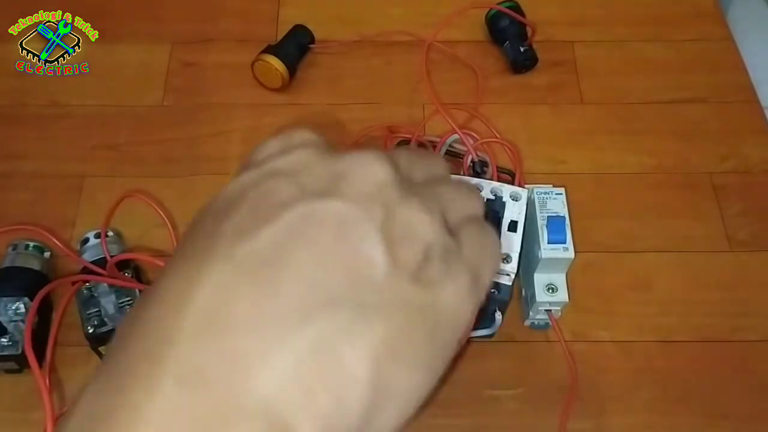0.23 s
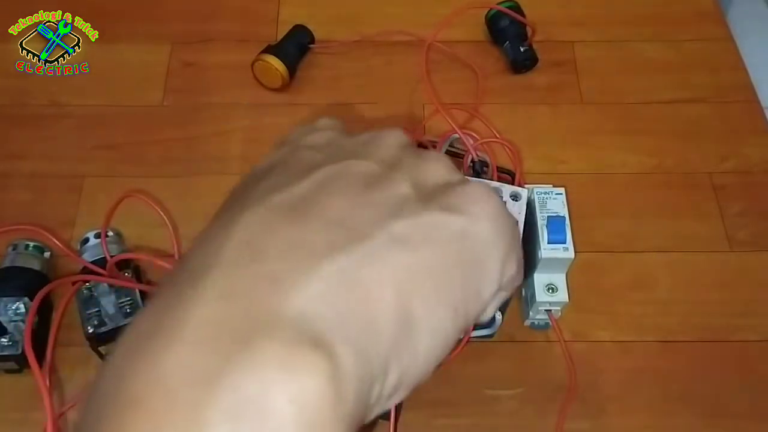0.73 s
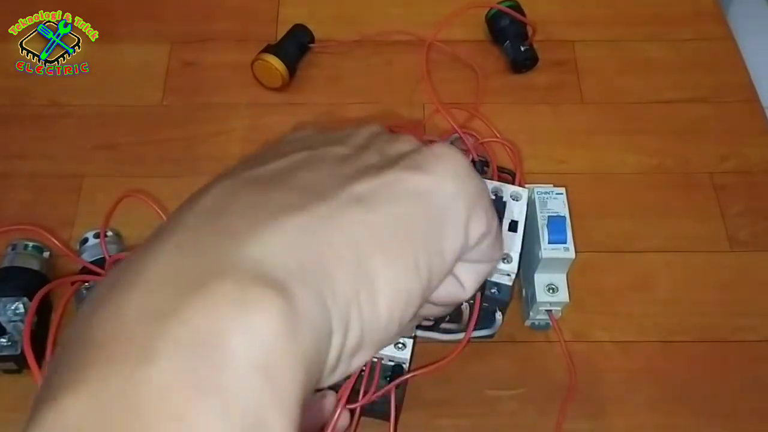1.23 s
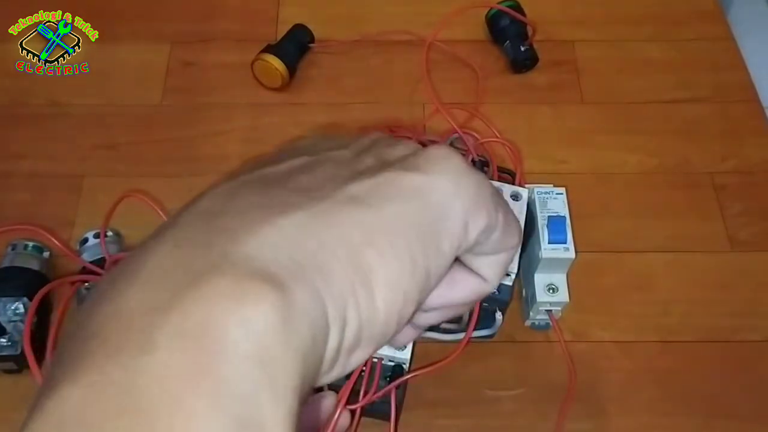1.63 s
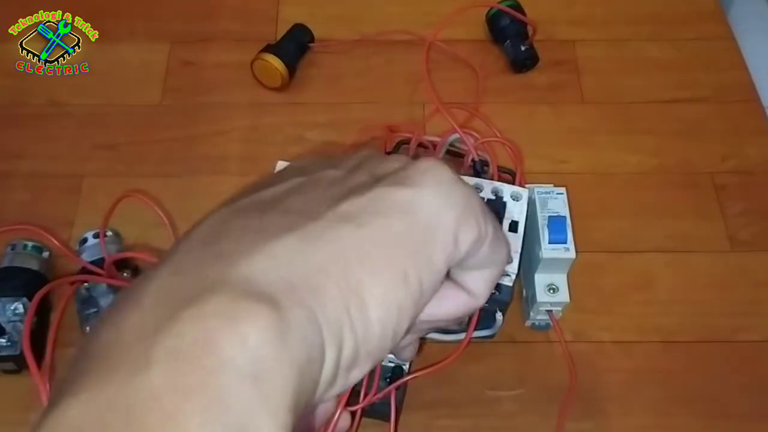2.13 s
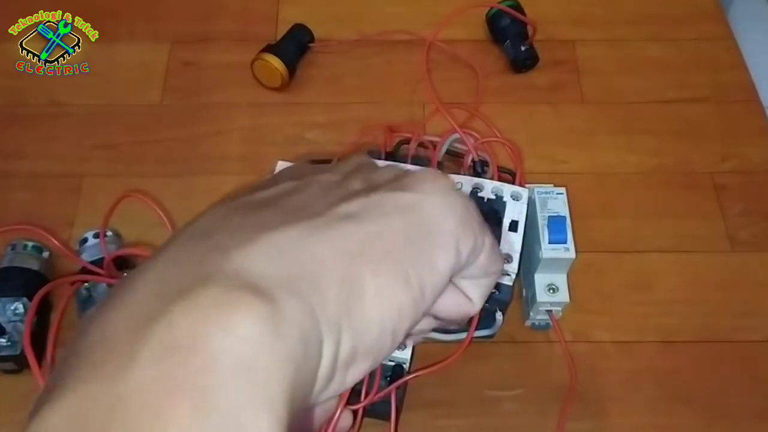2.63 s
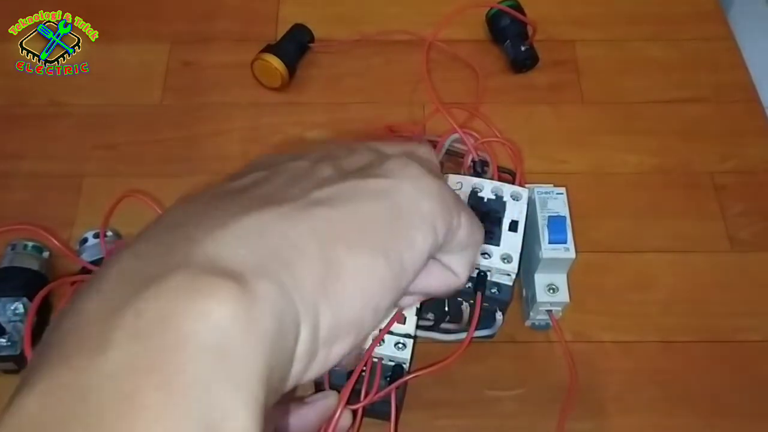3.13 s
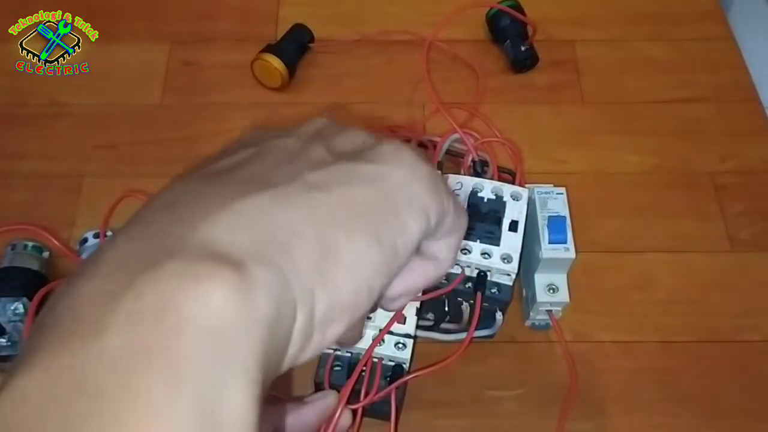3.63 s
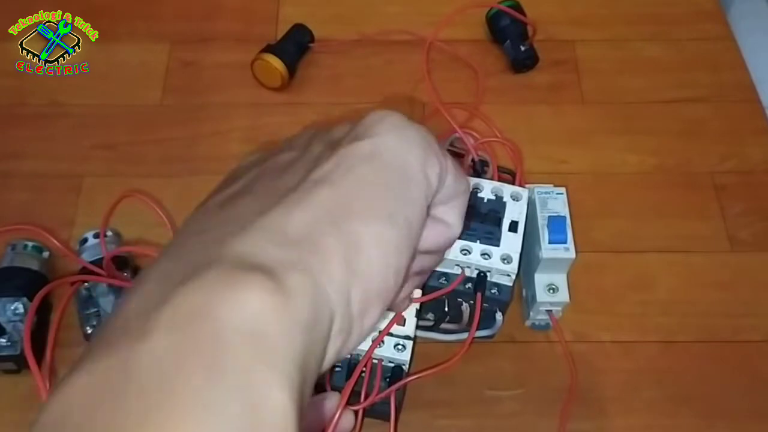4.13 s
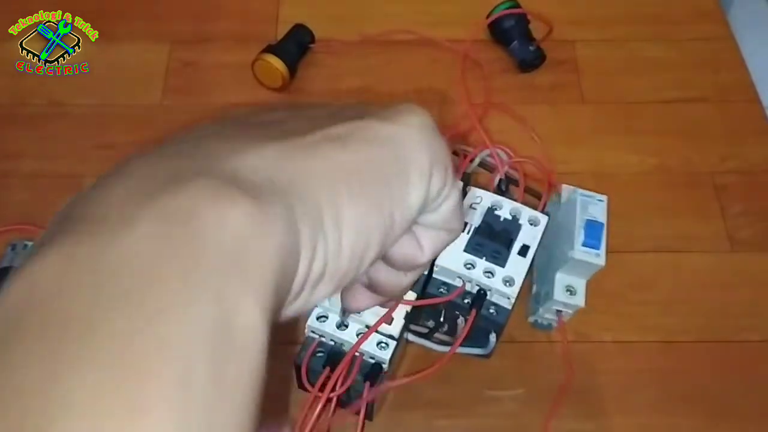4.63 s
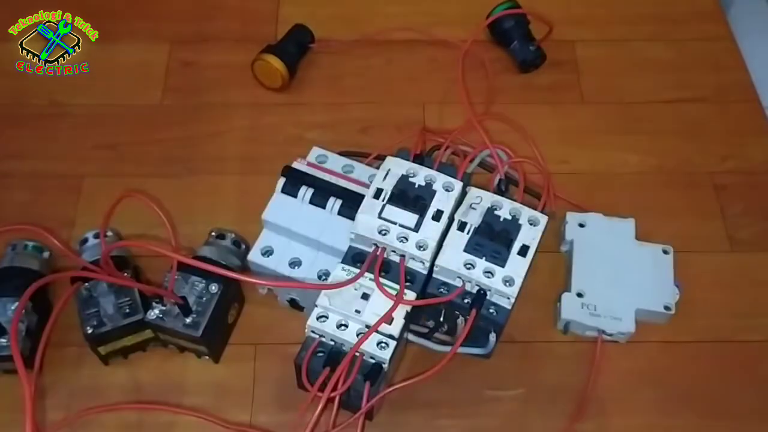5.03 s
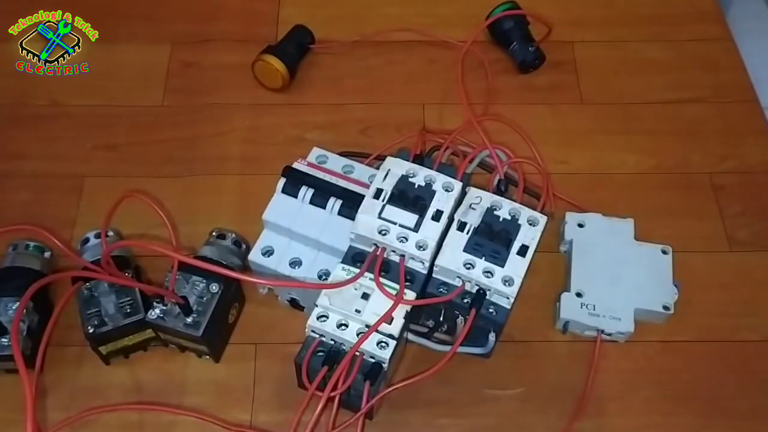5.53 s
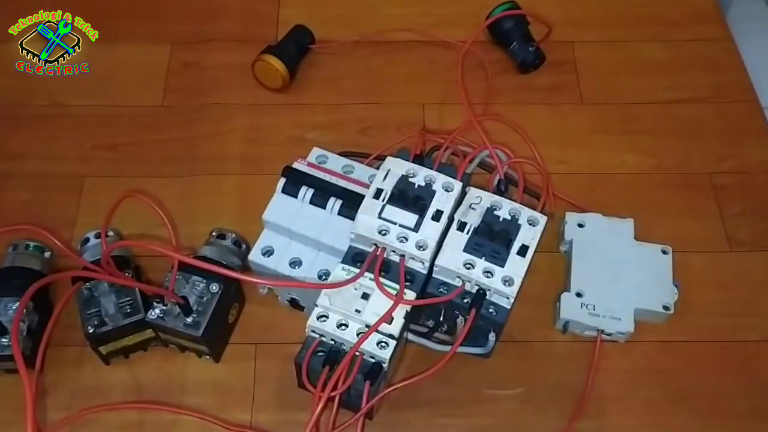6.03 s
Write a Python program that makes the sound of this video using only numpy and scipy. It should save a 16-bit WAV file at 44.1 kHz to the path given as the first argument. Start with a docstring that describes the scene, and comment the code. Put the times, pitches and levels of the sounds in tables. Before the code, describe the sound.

A quiet, bare small room with soft steady hiss and a faint low hum, heard closely in stereo. In the first half second, plastic cases, metal clamps and a steel tip clatter: a double click at 0.2 s and a stronger, springy jolt at 0.43 s, with soft thuds on wooden boards. Isolated bright clicks come near 1.2 s and a duller click with a low thud around 1.6 s. From 2 to 4 s there are faint ticks, dry rubs and short gritty scrapes, with sharper metallic ticks at 2.5 and 3.3 s. A click at 4.4 s leads into a firmer drag and grating. At 5.04 s a small plastic device topples with one loud, hard knock, a crack and woody slap with a short room tail. A small settling click and thud follow by 5.3 s, then quiet rubbing, a light scrape at 6.1 s and a last click at 6.26 s.

```python
"""Over a steady hiss and a low hum, a screwdriver and wires clatter into the terminals of plastic contactors
on a wooden floor: case, clamp and steel tip resonate, two jolts set springs ringing, the boards thud softly.
From two seconds on, faint ticks, grating runs of tiny slips and rubs of noise mark feeling hands and wires.
Near five seconds a small relay topples with one loud knock, a noise crack and slap over ringing modes;
rubs, a scrape and a last click follow. Shaped noise tails give the answer of a bare little room."""
import sys
import numpy as np
from scipy import signal
from scipy.fft import rfft, irfft, next_fast_len
from scipy.io import wavfile
from scipy.ndimage import uniform_filter1d, map_coordinates

SR = 44100
rng = np.random.default_rng(int(sys.argv[2]) if len(sys.argv) > 2 else 0)


def to_wav(s):
    """Save 16-bit WAV."""
    ch = np.atleast_2d(s).T  # columns
    pcm = np.round(np.clip(ch, -1, 1) * 32767)  # PCM
    wavfile.write(sys.argv[1], SR, pcm.astype(np.int16))


N = 276507

# resonances of the plastic case: (frequency [Hz], width of one pass [Hz], relative level [dB])
HOUSING = [(1440, 350, -4), (1880, 800, 11), (2620, 520, -12)]
# resonances of the terminal clamp: (frequency [Hz], width of one pass [Hz], relative level [dB])
CLAMP = [(4600, 1040, 0.19), (5010, 950, -2)]
# resonances of the steel tip: (frequency [Hz], width of one pass [Hz], relative level [dB])
TIP = [(9250, 620, 3.5), (10620, 680, -3), (11330, 680, -11.5)]
# broad resonances of the dry snap: (frequency [Hz], width [Hz], relative level [dB])
SNAP = [(3250, 1700, -7.5), (6850, 790, 0.5), (8400, 1400, 0), (10750, 1600, -0.5)]
# colour that small contacts throw into the room: (frequency [Hz], relative level [dB])
CLICK_ROOM = [(1500, -1), (3000, 0), (4500, 0.5), (9000, 2), (11500, 1), (13000, 0.5)]
# left-right likeness of room sound: (frequency [Hz], correlation [-1 to 1])
ROOM_ALIKE = [(150, 0.99), (350, 0.89), (700, 0.28), (1500, 0), (8000, 0)]

CASE_HZ, SPRING_HZ, TIP_HZ = 1900, 4770, 9250  # reference pitches


def amp(db):
    """Decibels to amplitude."""
    return 10 ** (np.asarray(db) / 20)


def unit(x):
    """Scaled to rms 1."""
    return x / np.sqrt(np.mean(x ** 2) + 1e-20)


def packet(x):
    """Scaled to energy 1 per channel."""
    return x / np.sqrt(np.sum(x ** 2, axis=-1, keepdims=True) + 1e-20)


def along(points, hz):
    """Read (frequency, value) points on a log frequency axis."""
    f, v = np.transpose(points)
    return np.interp(np.log(hz + 1), np.log(f), v)


def filtered(x, response):
    """Multiply the spectrum of x by a response of frequency."""
    n = x.shape[-1]
    m = next_fast_len(n + SR // 4)
    return irfft(rfft(x, m) * response(np.fft.rfftfreq(m, 1 / SR)), m)[..., :n]


def resonate(x, peaks, order=1):
    """Ring a body's resonances; a higher order darkens the valleys between them."""
    def response(f):
        total = 0
        for k, (centre, width, db) in enumerate(peaks):
            bandpass = 1j * f * width / (centre * centre - f * f + 1j * f * width)
            total = total + (-1) ** (k * order) * amp(db) * bandpass ** order
        return total
    return filtered(x, response)


def retuned(body, ratio):
    """The same resonances, higher or lower."""
    return [(hz * ratio, width, db) for hz, width, db in body]


def noise(size, spectrum, alike):
    """Stereo noise of rms 1; the balance of mid and side sets its left-right likeness."""
    def response(hz):
        turn = np.arccos(np.clip(along(alike, hz), -1, 1)) / 2
        return amp(along(spectrum, hz)) * np.array([np.cos(turn), np.sin(turn)])
    mid, side = filtered(rng.standard_normal((2, size)), response)
    return unit(np.array([mid + side, mid - side]))


def add(track, s, sound):
    """Mix a sound in at time s."""
    part = track[:, round(s * SR):][:, :sound.shape[-1]]
    part += sound[..., :part.shape[1]]


def room(spectrum, gap, early_db, wall_s=0.013, wall_t60=0.33):
    """A fresh room answer: a tail that builds up and dies band by band, with a flare from the nearest wall."""
    # decay of the room: (frequency [Hz], t60 [s])
    room_t60 = [(150, 0.54), (300, 0.61), (700, 0.54), (2000, 0.61), (5000, 0.47), (10000, 0.47),
                (15000, 0.23)]
    hz, t, z = signal.stft(noise(SR * 2 // 3, spectrum, ROOM_ALIKE), SR, nperseg=256)
    tail = signal.istft(z * amp(-60 * t / along(room_t60, hz)[:, None]), SR, nperseg=256)[1]
    t = np.arange(tail.shape[1]) / SR
    flare = (t > wall_s) * amp(early_db - 60 * np.abs(t - wall_s) / wall_t60)
    return packet(tail * (1 - np.exp(-(t / gap) ** 2)) * (1 + flare))


def contact(body, t60, rise, detune=0.0067, order=1, blow=0):
    """An optional clean blow and a brief scrape ring a body, tuned a little differently each time."""
    t = np.arange(SR // 20) / SR
    scrape = noise(len(t), [(11500, -4.5), (14000, -5.5)], [(2000, 0.94), (9000, 0.034)])
    scrape *= amp(-60 * t / t60) * (1 - np.exp(-t / rise))
    impulse = np.arange(len(t)) == round(2 * rise * SR)
    push = packet(scrape) + blow * impulse
    peaks = [(hz * np.exp(detune * rng.standard_normal()), width, db) for hz, width, db in body]
    return packet(resonate(push, peaks, order=order))


def background():
    """Steady room air, a low hum that partly wavers, and microphone hiss."""
    # colour of the room air: (frequency [Hz], relative level [dB])
    air = [(22, 1), (32, -7.5), (50, -14), (75, -5), (110, -17.5), (170, -12), (260, -14.5), (700, -17),
           (1400, -15), (2400, -19.5), (4000, -29), (6300, -32.5), (9300, -29.5), (15800, -52)]
    # colour of the treble hiss: (frequency [Hz], relative level [dB])
    air_top = [(7000, -19), (9300, -3.5), (10800, -10), (12000, -23.5)]
    # left-right likeness of air and hiss: (frequency [Hz], correlation [-1 to 1])
    air_alike = [(60, 0.53), (130, 0.77), (290, 0.65), (640, 0.4), (1410, -0.2), (3100, 0.047),
                 (6820, -0.081), (15000, 0.041)]
    # noise through narrow low resonances wavers in level
    waver = resonate(noise(N, [(100, 0)], [(100, 0.99)]), [(80.7, 8.1, 11.0), (170.8, 6.3, -2.0)])
    waver = unit(resonate(waver, [(71.0, 23, -13.5), (166.0, 18, 13.5)]))
    steady = unit(np.sin(2 * np.pi * 78.4 * np.arange(N) / SR))
    hum = amp(-68.5) * steady + amp(-71.5) * waver
    return amp(-55) * noise(N, air, air_alike) + hum + amp(-70.0) * noise(N, air_top, air_alike)


def rubbing(grit_db=3, catch_db=2.0, catches_per_s=35, grains_per_s=260, grain_db=-4, spread_db=4):
    """Tiny slips: pressure makes cases drag and catch on wood, sliding makes insulation scuff and crackle."""
    # strokes of hand and wires: (start [s], length [s], pressure level [dB], sliding level [dB])
    rubs = [(2.07, 0.32, -59.5, -64), (2.45, 0.075, -58, -69), (2.87, 0.086, -67, -56.5),
            (3.491, 0.16, -58.5, -63.5), (3.883, 0.15, -59.5, -68), (4.415, 0.19, -47, -56.5),
            (4.583, 0.25, -56.5, -60), (5.642, 0.15, -57.5, -66), (6.018, 0.38, -65, -57.5)]
    # case dragged on wood: (frequency [Hz], width [Hz], relative level [dB])
    drag_body = [(172, 42, 1.5), (292, 31, 4), (371, 110, -2.5), (1560, 1500, -12.5)]
    # colour of sliding insulation: (frequency [Hz], relative level [dB])
    slide = [(500, 9), (1800, 8), (3500, -0.5), (6000, -1), (9500, 9.5), (12000, -2.5), (13500, -8),
             (15000, -21)]
    swell_power = 0.57  # each stroke is a half sine raised to this power
    out, t = np.zeros((2, N)), np.arange(N) / SR
    slips = amp(grit_db * unit(uniform_filter1d(rng.standard_normal(N), size=120)))
    catches = amp(catch_db * map_coordinates(rng.standard_normal(N // 100), [t * catches_per_s]))
    drag = unit(catches * resonate(slips * noise(N, [(1000, 0)], ROOM_ALIKE), drag_body))
    grains = (rng.random(N) < grains_per_s / SR) * amp(spread_db * rng.standard_normal((2, N)))
    crackle = unit(filtered(grains, lambda hz: amp(along(slide, hz)) * (hz > 1000)))
    scuff = slips * noise(N, slide, ROOM_ALIKE)
    hiss = unit(np.sqrt(catches) * (scuff + amp(grain_db) * crackle))
    for s, length, pressure_db, sliding_db in rubs:
        swell = np.abs(np.sin(np.pi * np.clip((t - s) / length, 0, 1))) ** swell_power
        out += swell * (amp(pressure_db) * drag + amp(sliding_db) * hiss)
    return out


def thuds(main_rise=0.0052, upper_rise=0.003, sag=0.43, upper_sag=0.06, settle=0.0091):
    """Soft thuds on the boards swell and die, their pitch gliding quickly down to rest."""
    # the assembly rocks on the boards: (time [s], level [dB], upper mode over main mode [dB])
    rockings = [(0.083, -52, -4), (.199, -44.5, 9.5), (.431, -37.5, -2), (1.195, -48.5, -10),
                (1.625, -36.5, -24), (2.905, -50, -10), (3.66, -63.5, 16.5), (4.211, -50.5, -14),
                (5.274, -44, -27)]
    # resting pitches and decays of the main rocking mode and of the quicker upper mode
    board_hz, board_t60_s = 167.3, 0.22
    upper_hz, upper_t60_s = 380, 0.087
    out, t = np.zeros((2, N)), np.arange(SR // 3) / SR

    def phase(hz, glide):
        return 2 * np.pi * hz * np.cumsum(1 + glide * np.exp(-t / settle)) / SR

    for s, db, upper_db in rockings:
        # low noise roughens the phase of both modes
        grain = noise(len(t), [(50, 13), (130, -6), (400, -90)], [(100, 0.96)])
        main = amp(-60 * t / board_t60_s) * (1 - np.exp(-t / main_rise))
        main = main * np.sin(phase(board_hz, sag) + 0.36 * grain)
        upper = amp(upper_db - 60 * t / upper_t60_s) * (1 - np.exp(-t / upper_rise))
        upper = upper * np.sin(phase(upper_hz, upper_sag) + 0.96 * grain)
        add(out, s, amp(db) * (main + upper))
    return out


def scrapes(slips_per_s=330, spread_db=4):
    """Parts grate on one another: an uneven run of tiny slips rings plastic and steel."""
    # grating runs: (start [s], length [s], case level [dB], steel level [dB]), before the mix trims
    runs = [(2.462, 0.053, -27, -47), (2.899, .05, -25.5, -35), (3.312, .024, -30, -32),
            (4.656, .05, -41, -40), (4.734, .045, -29, -30.5), (5.183, 0.03, -29, -35),
            (6.07, 0.063, -43, -24)]
    out, t = np.zeros((2, N)), np.arange(SR // 8) / SR
    for s, length, case_db, steel_db in runs:
        slips = (rng.random(len(t)) < slips_per_s / SR) * amp(spread_db * rng.standard_normal(len(t)))
        slips = slips * (t < length)
        plastic = packet(resonate(slips, HOUSING + CLAMP, order=2))
        steel = packet(resonate(slips, SNAP + TIP))
        grit = amp(case_db) * plastic + amp(steel_db) * steel
        answer = room(CLICK_ROOM, gap=0.004, early_db=-13)
        add(out, s, amp(-4.0) * grit)
        add(out, s, amp(-1.5) * signal.fftconvolve(grit[None], answer, axes=1))
    return out


def jolts(wet_db=-7.0, scatter_db=2, chatter=0.038):
    """Springs in a jolted contactor chatter in their seats, which smears their ring; the room carries it on."""
    # a contactor is jolted: (time [s], level [dB], pitch of the reference spring mode [Hz])
    hits = [(0.197, -13, 4770), (0.4278, -8, 4600)]
    # spring modes at the reference pitch: (frequency [Hz], relative level [dB], t60 [s])
    springs = [(1900, -8, .07), (2900, -3.5, 0.054), (4370, -4, 0.035), (4770, 4.5, 0.034),
               (5000, -12, 0.059), (6400, -7, .05), (7200, -3, 0.031), (8280, 2, .05), (10100, 7, 0.048),
               (11200, 3.5, .04)]
    out, t = np.zeros((2, N)), np.arange(SR // 6) / SR
    for s, db, pitch_hz in hits:
        ring = np.zeros((2, len(t)))
        for hz, level, t60 in springs:
            # a random walk of phase blurs each mode
            drift = chatter * np.sqrt(hz / CASE_HZ) * np.cumsum(rng.standard_normal(ring.shape), axis=1)
            phase = 2 * np.pi * (hz * pitch_hz / SPRING_HZ * t + rng.random((2, 1))) + drift
            mode_db = level + scatter_db * rng.standard_normal((2, 1))
            ring += amp(mode_db - 60 * t / t60) * np.sin(phase)
        ring = packet(ring)
        answer = room(CLICK_ROOM, gap=0.005, early_db=8, wall_s=0.015, wall_t60=0.19)
        add(out, s, amp(db) * ring)
        add(out, s, amp(db + wet_db) * signal.fftconvolve(ring, answer, axes=1))
    return out


def knock(s=5.0367, flat_after=0.001173, low_cut_hz=128):
    """The relay grazes the wood, cracks down on its edge, then slaps flat and drives the board."""
    # modes of the relay and the board under it: (frequency [Hz], relative level [dB], t60 [s])
    modes = [(159, -13.5, 0.15), (196, -16, 0.22), (242, -9.5, 0.066), (288, -3.5, 0.16),
             (347, -4.5, 0.086), (417, -7, 0.055), (593, -23.5, 0.41), (772, -29, 0.39), (861, -14.5, 0.13),
             (970, -21.5, .25), (1040, -30, 0.14), (1190, -21.5, 0.26), (1306, -25, 0.26),
             (1338, -17.5, 0.2), (1407, -11, 0.15), (1550, -15.5, 0.27), (1600, -12.5, 0.2),
             (1770, -18, 0.21), (1867, -11.5, 0.19), (1917, -20, 0.22), (2104, -26, 0.13), (2170, -21, 0.2),
             (2256, -22, 0.195), (2425, -20, 0.36), (2517, -13.5, 0.09), (2850, -32.5, 0.097),
             (3630, -20, 0.23), (3860, -30, .24), (4190, 1, 0.022), (5200, -27, 0.0394)]
    # colour that the blow throws into the room: (frequency [Hz], relative level [dB])
    knock_colour = [(100, -62), (160, -6.5), (200, -17.5), (310, -5), (490, -12), (700, -9.5), (1000, -9),
                    (1700, -8), (2600, -11), (3800, -13), (4250, -11.5), (4800, -18), (6000, -22.5),
                    (10600, -27), (12500, -36), (15500, -70)]
    out, t = np.zeros((2, N)), np.arange(SR // 2) / SR
    add(out, s - .009, amp(-24.0) * contact(CLAMP + SNAP, t60=0.0078, rise=.0002))  # the graze

    crack_colour = [(700, -13), (2600, 1.5), (4200, -0.5), (6000, -5.0),
                    (10800, -11), (13000, -20), (15000, -53)]
    crack = noise(len(t), crack_colour, [(2000, 0.47), (5000, 0.019)])
    crack *= amp(-60 * t / 0.014) * (1 - np.exp(-(t / 0.0011) ** 2))
    add(out, s, amp(-6.5) * crack)

    for k, (hz, db, t60) in enumerate(modes):
        # short waves reach the two microphones out of step
        skew = np.arccos(np.clip(along(ROOM_ALIKE, hz / 3), -1, 1)) / 2 * rng.choice([-1, 1])
        phase = 2 * np.pi * hz * t + np.array([[skew], [-skew]])
        # each mode builds up with a time constant of half a cycle
        envelope = amp(db - 10.5 - 60 * t / t60) * (1 - np.exp(-t * hz / .5))
        add(out, s + flat_after, (-1) ** k * envelope * np.sin(phase))

    # the flat side shoves the board for a few cycles
    shove = np.sin(2 * np.pi * 295 * t) * amp(-60 * t / 0.01) * (1 - np.exp(-t / 0.0035))
    add(out, s + flat_after, -amp(-15.0) * shove)

    slap_colour = [(300, -5.0), (500, -4), (800, -3), (1700, 2.0), (3000, -3.0), (6000, -39)]
    slap = noise(len(t), slap_colour, [(500, 0.88), (1500, 0.41), (3000, .1)])
    slap *= amp(-60 * t / 0.028) * (1 - np.exp(-t / 0.002))
    add(out, s + flat_after, amp(-3.0) * slap)

    add(out, s, amp(11.5) * room(knock_colour, gap=0.004, early_db=-0.5))
    # a steep low cut leaves the knock almost no deep bass
    return signal.sosfilt(signal.butter(6, low_cut_hz, "highpass", fs=SR, output="sos"), out)


def click(case_db, case_hz, clamp_db, tip_db, tip_hz, snap_db, pan_db):
    """One contact and its room: case, clamp and tip ring; a hard snap lengthens the scrape."""
    # 22 ms at a snap of -17 dB, doubling with every 44 dB
    t60 = 0.022 * 2 ** ((snap_db + 17) / 44)
    blow = 0.59  # weight of the clean blow against the scrape
    housing, tip = retuned(HOUSING, case_hz / CASE_HZ), retuned(TIP, tip_hz / TIP_HZ)
    direct = amp(case_db) * contact(housing, t60=0.65 * t60, rise=0.000498, order=2, blow=blow)
    direct += amp(clamp_db) * contact(CLAMP, t60=t60, rise=0.00033, order=2, blow=blow)
    direct += amp(tip_db) * contact(tip, t60=0.84 * t60, rise=0.0003, order=2, blow=blow)
    direct += amp(snap_db) * contact(SNAP, t60=1.8 * t60, rise=0.00052)
    answer = room(CLICK_ROOM, gap=0.0018, early_db=4, wall_s=0.011, wall_t60=0.31)
    out = amp(-8.5) * signal.fftconvolve(direct, answer, axes=1)
    pan = amp(np.array([[pan_db], [-pan_db]]) / 2)
    add(out, 0, amp(-2.25) * direct * pan)
    return out


def clicks(count=7):
    """Tool and parts meet in clear contacts; faint ticks scatter while the fingers feel their way."""
    # contacts, levels before the mix trims: (time [s], plastic case level [dB], case pitch [Hz],
    # clamp level [dB], steel tip level [dB], tip pitch [Hz], dry snap level [dB], left over right [dB])
    contacts = [(0.071, -29.5, 2050, -40, -26, 9200, -24.5, 4),
                (0.194, -20.5, 1950, -21, -30, 9200, -17.5, -11),
                (0.1996, -19, 1780, -20.5, -24, 9200, -15.5, 10),
                (0.3578, -35, 2200, -27, -20, 9150, -19.5, 4),
                (.368, -23.5, 1900, -26, -22, 9000, -20.5, 0), (0.4217, -27, 2200, -21, -19, 9900, -26, 6),
                (0.4264, -16, 1980, -16, -12, 9000, -5.5, 1), (.863, -32.5, 2020, -41, -41, 9400, -46, -2),
                (1.1873, -19, 2100, -22, -15, 9380, -35, 5), (1.591, -27.5, 1920, -52, -50, 9300, -52, 3),
                (1.622, -29, 1900, -33, -36, 9500, -28, 3), (1.6312, -37, 1780, -36, -33, 9400, -30, 1),
                (1.688, -20.5, 1950, -41, -28.5, 9260, -32, 5),
                (2.496, -30.5, 2250, -47, -46, 9300, -51, 2), (2.5141, -31, 1810, -27.5, -10, 9250, -42, 1),
                (2.586, -50, 1870, -49, -42, 9250, -33, 0),
                (2.7903, -20.5, 1810, -34.5, -36, 9220, -33, -1),
                (2.891, -32, 2050, -40, -22, 9410, -33, 0), (2.903, -22.5, 1750, -41, -34, 9500, -34, 1),
                (2.926, -29, 1560, -39, -29, 9100, -38, 0), (3.3045, -32, 2170, -35, -23, 9140, -22, -1),
                (3.321, -26, 1670, -22, -14.5, 9200, -34, 3), (3.659, -33, 1830, -51, -35, 9360, -31.5, -1),
                (3.727, -33, 2040, -39, -36, 9300, -31.5, 0),
                (3.833, -28.5, 1680, -35, -38, 9350, -31.5, 2), (4.286, -39, 2050, -39, -45, 9300, -36, 0),
                (4.3833, -23, 2100, -33, -27, 9400, -26.5, 1), (4.384, -21.5, 1380, -38, -27, 8850, -35, 0),
                (4.679, -34, 2400, -32, -42, 8930, -21.5, -1), (4.757, -26.5, 2400, -39, -36, 9300, -32, 0),
                (5.1862, -28, 1730, -35, -32, 8950, -18.5, -5), (5.201, -30, 1900, -36, -36, 9300, -26, -2),
                (6.2604, -32.5, 2020, -48, -29, 9300, -22, -6)]
    fiddle_from_s, fiddle_to_s = 2.1, 3.6
    tick_db, tick_spread_db = -43, 3
    out = np.zeros((2, N))
    for s, *row in contacts:
        add(out, s, click(*row))
    for share in rng.random(count):
        s = fiddle_from_s + share * (fiddle_to_s - fiddle_from_s)
        db = tick_db + tick_spread_db * rng.standard_normal()
        add(out, s, click(db, CASE_HZ, db - 10, db, TIP_HZ, db - 8, 0))
    return out


def scene():
    """Everything at the microphones."""
    return clicks() + jolts() + scrapes() + thuds() + knock() + rubbing() + background()


def record(dry):
    """Peaks near full scale are rounded off, then nothing is kept above the band limit."""
    held = dry / (1 + np.abs(dry) ** 6) ** (1 / 6)
    return filtered(held, lambda hz: hz < 15750)


dry = scene()
out = record(dry)
to_wav(out)
```